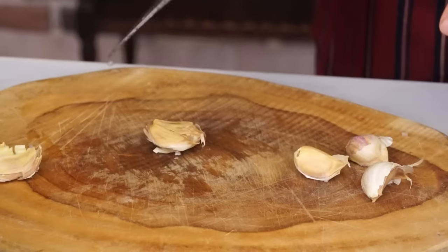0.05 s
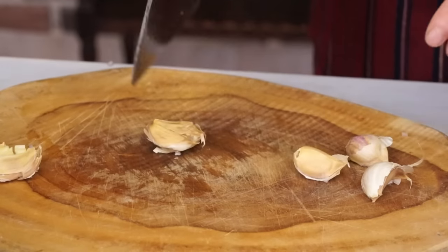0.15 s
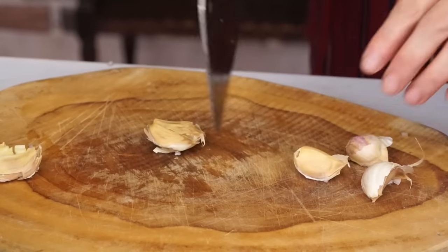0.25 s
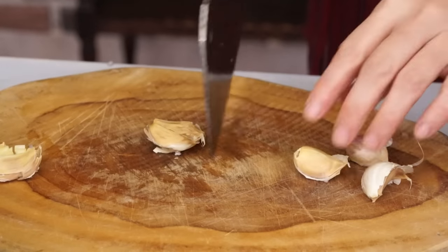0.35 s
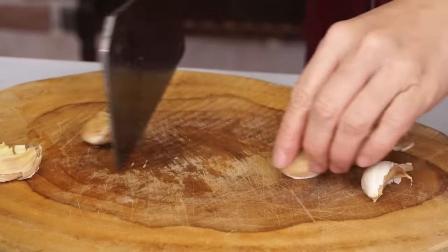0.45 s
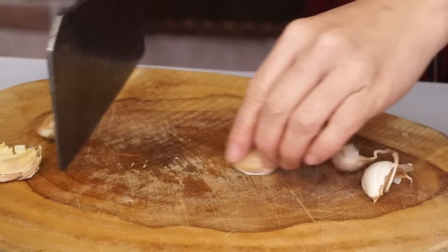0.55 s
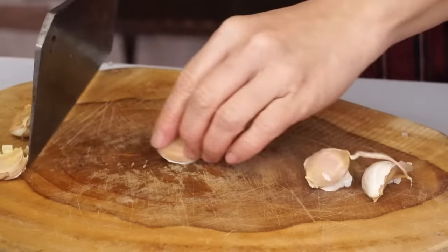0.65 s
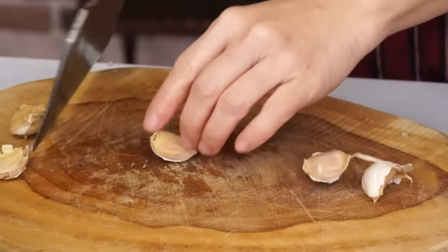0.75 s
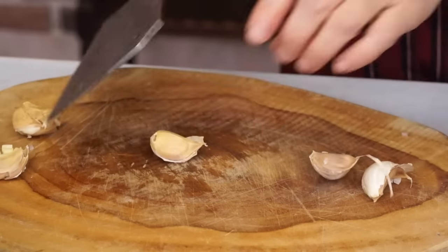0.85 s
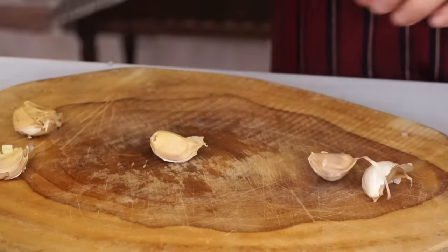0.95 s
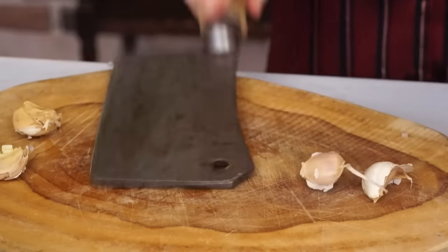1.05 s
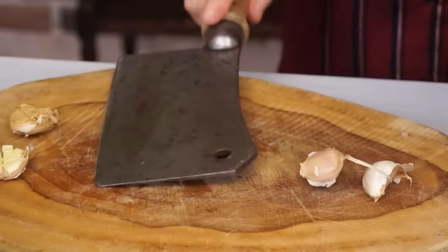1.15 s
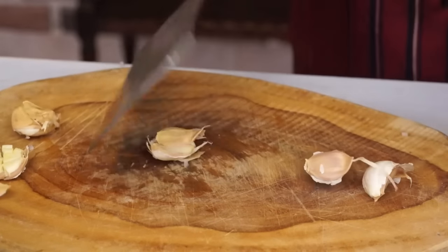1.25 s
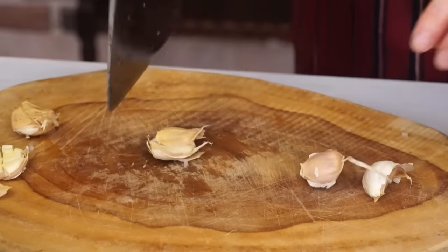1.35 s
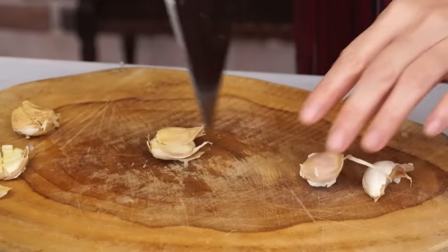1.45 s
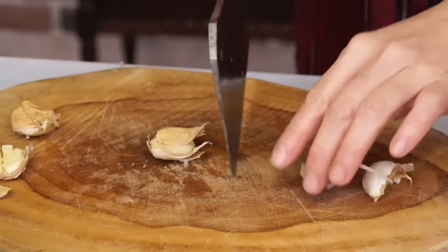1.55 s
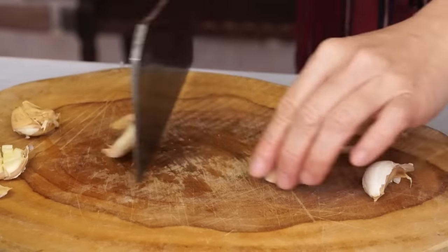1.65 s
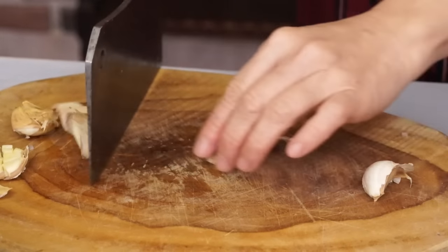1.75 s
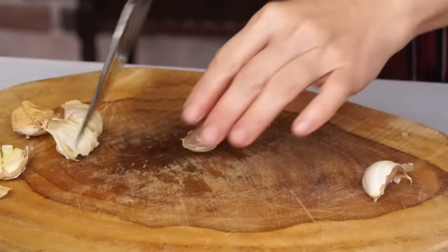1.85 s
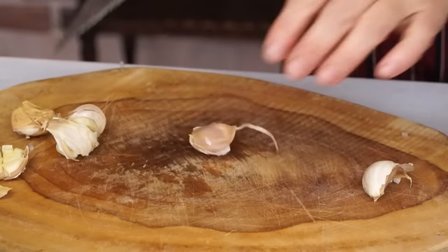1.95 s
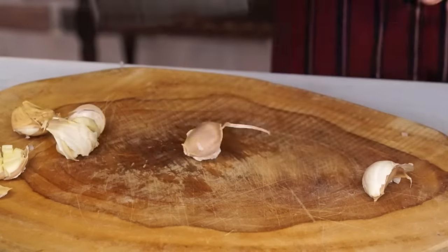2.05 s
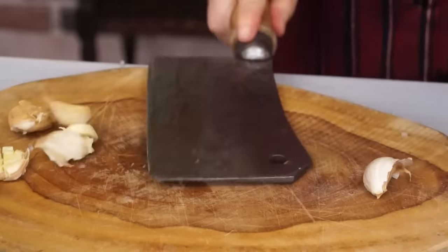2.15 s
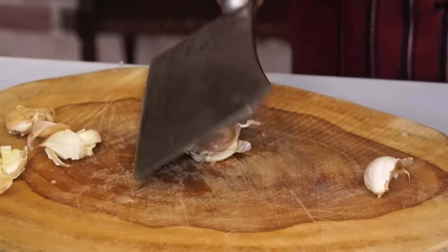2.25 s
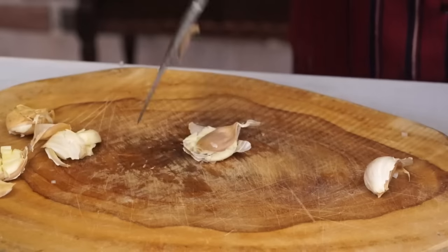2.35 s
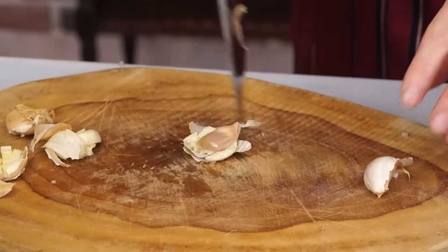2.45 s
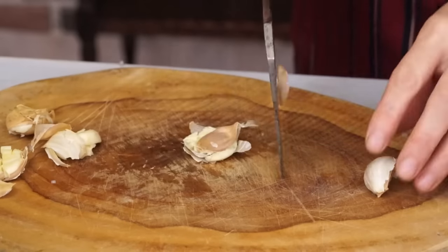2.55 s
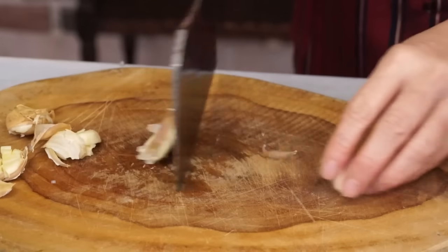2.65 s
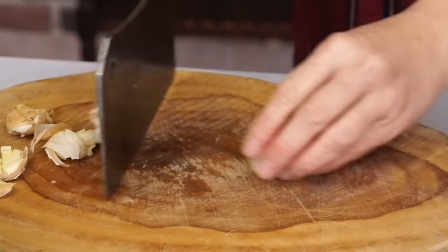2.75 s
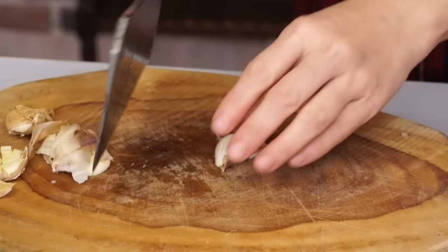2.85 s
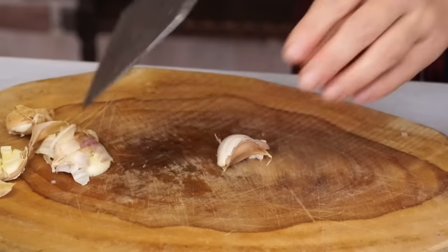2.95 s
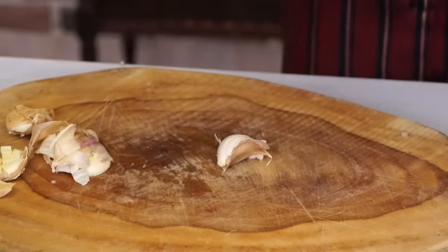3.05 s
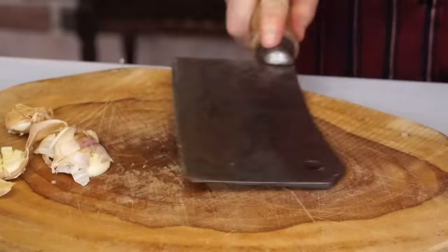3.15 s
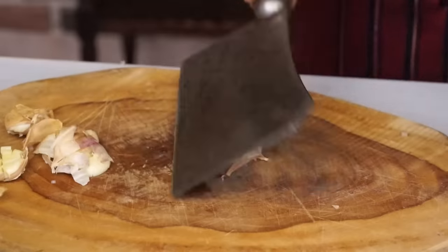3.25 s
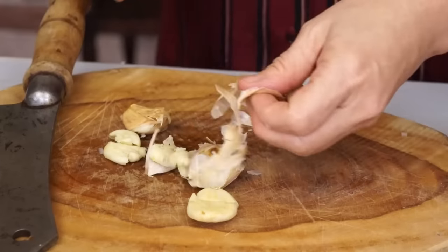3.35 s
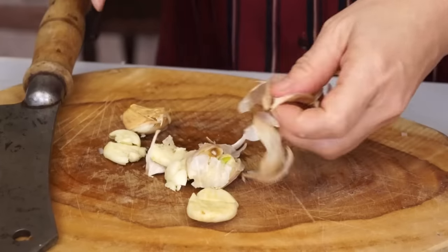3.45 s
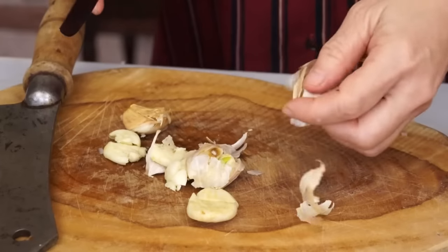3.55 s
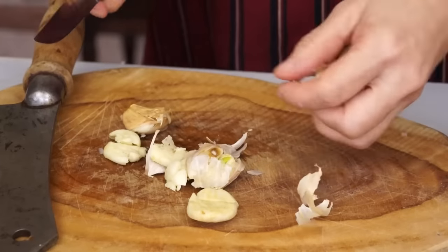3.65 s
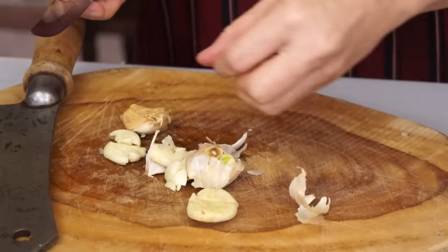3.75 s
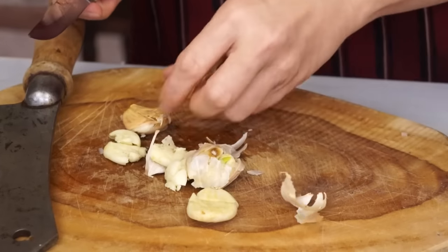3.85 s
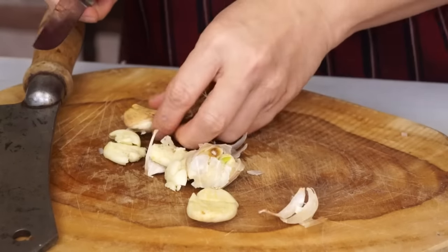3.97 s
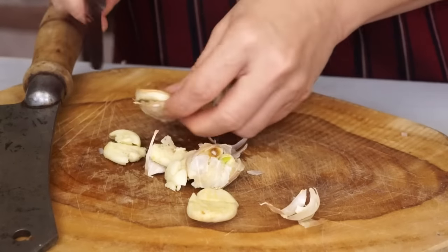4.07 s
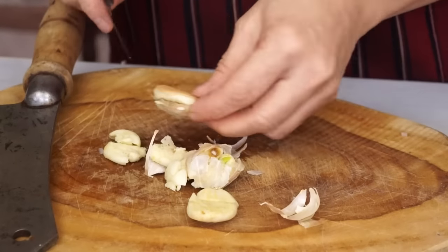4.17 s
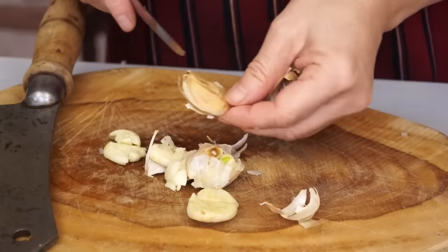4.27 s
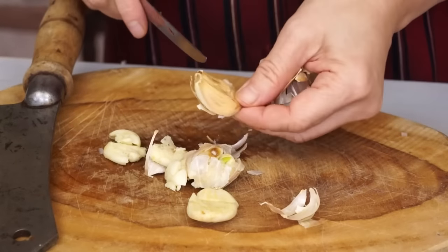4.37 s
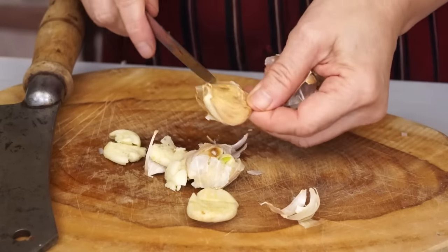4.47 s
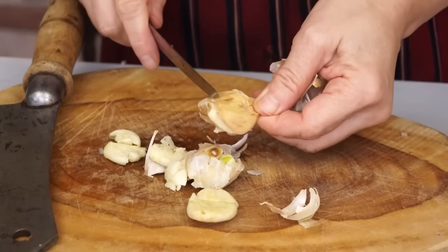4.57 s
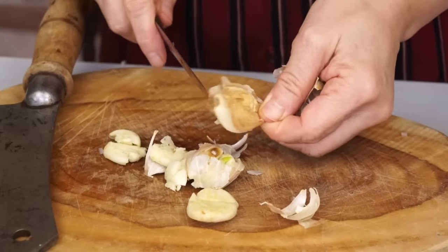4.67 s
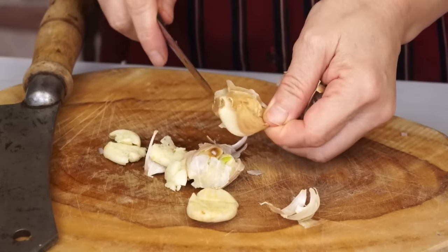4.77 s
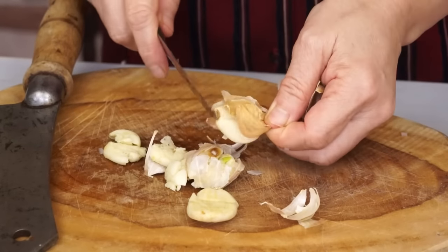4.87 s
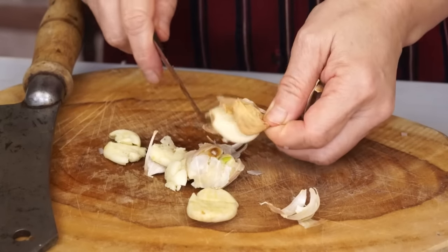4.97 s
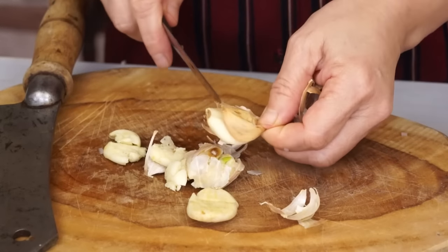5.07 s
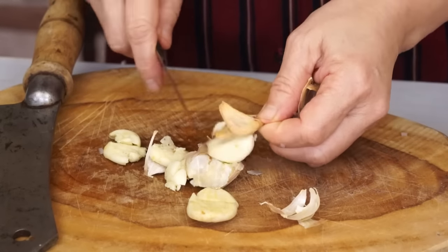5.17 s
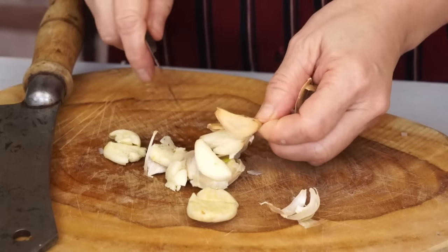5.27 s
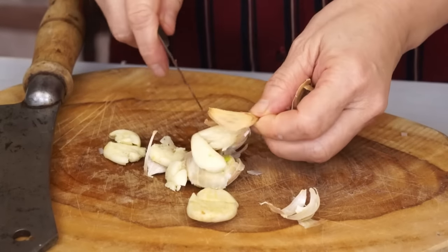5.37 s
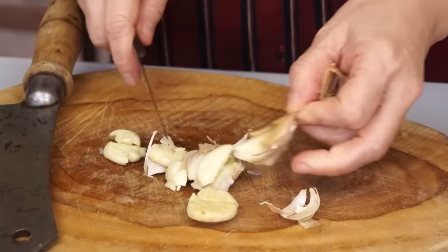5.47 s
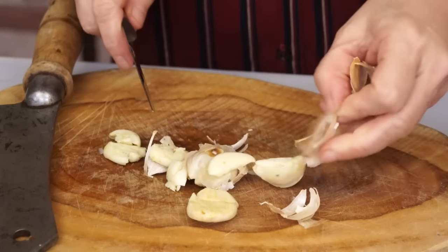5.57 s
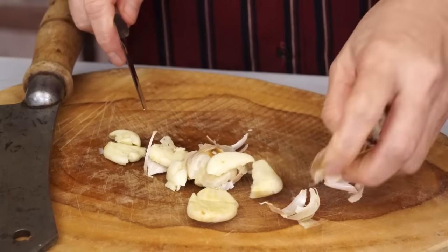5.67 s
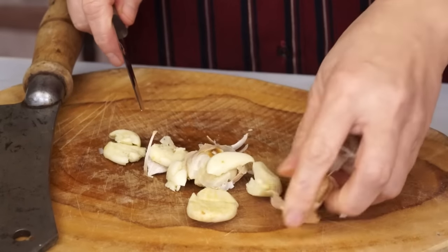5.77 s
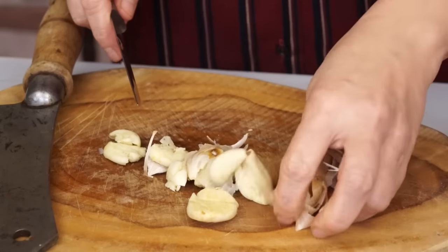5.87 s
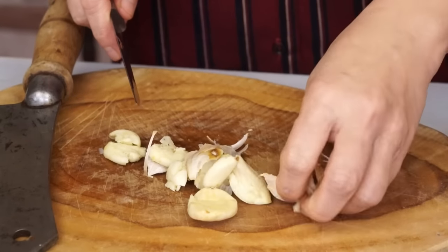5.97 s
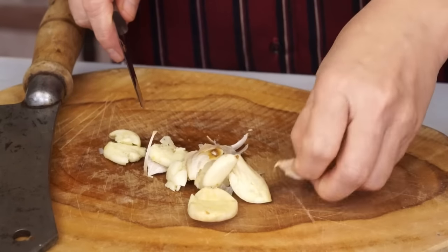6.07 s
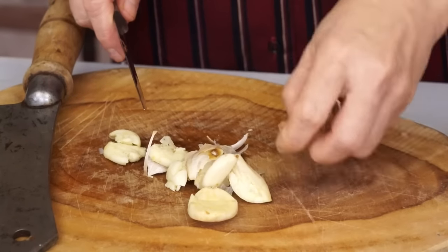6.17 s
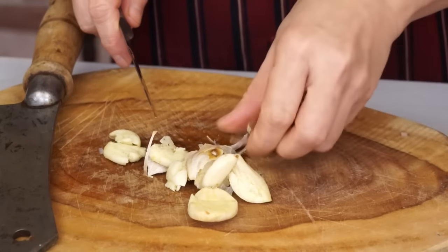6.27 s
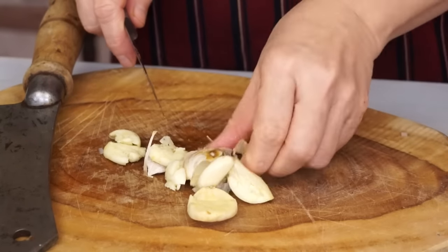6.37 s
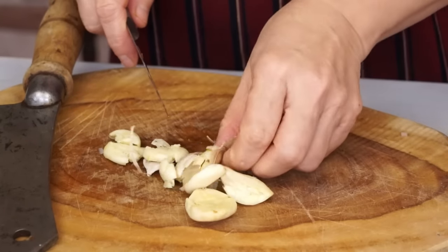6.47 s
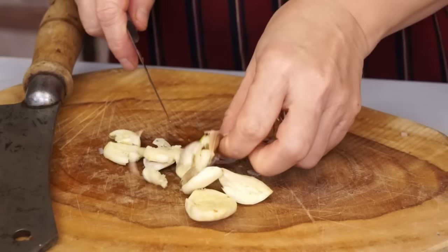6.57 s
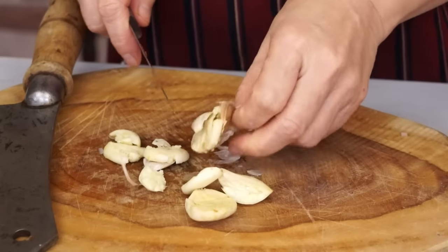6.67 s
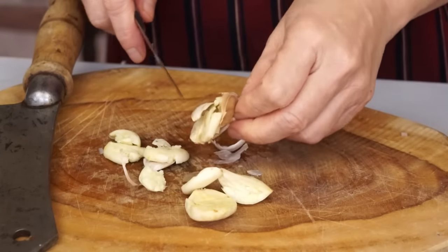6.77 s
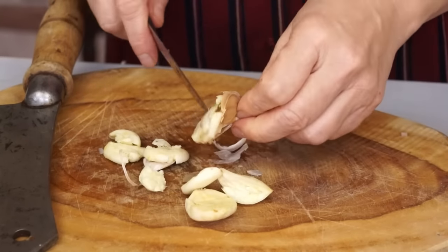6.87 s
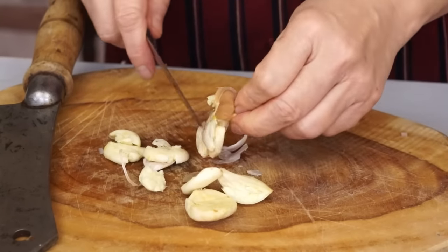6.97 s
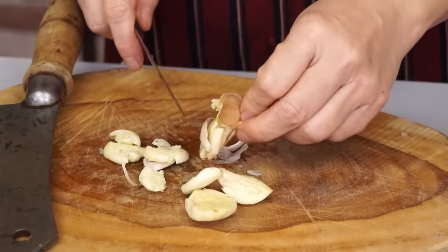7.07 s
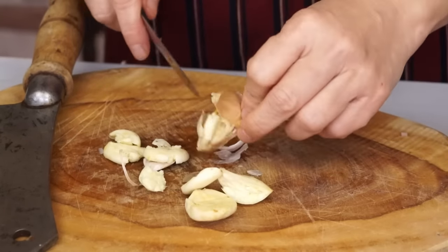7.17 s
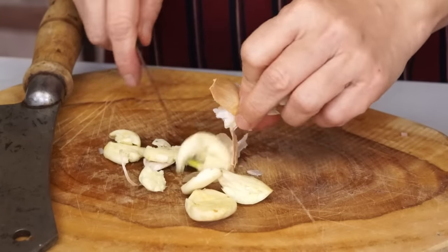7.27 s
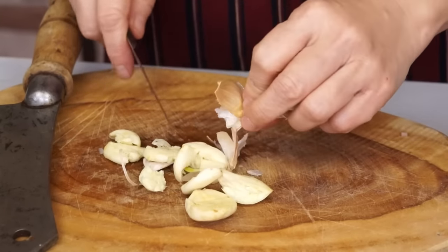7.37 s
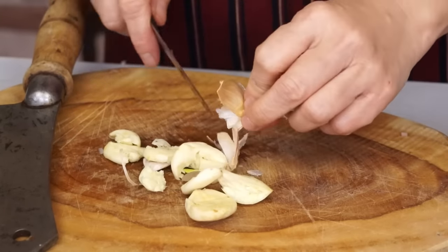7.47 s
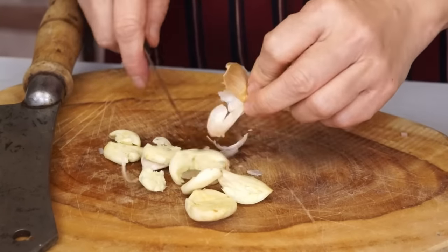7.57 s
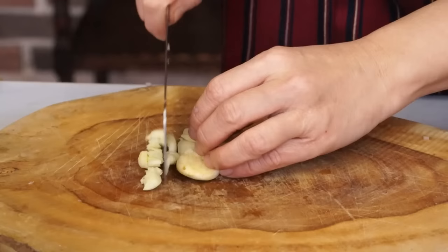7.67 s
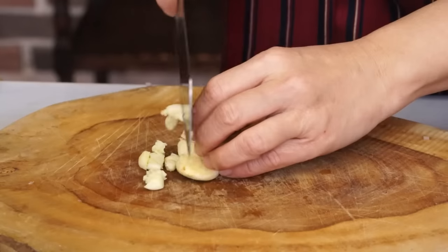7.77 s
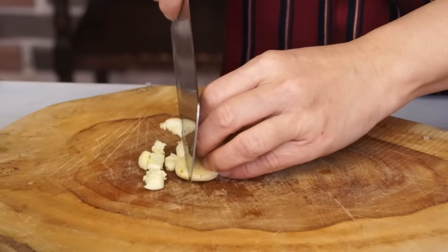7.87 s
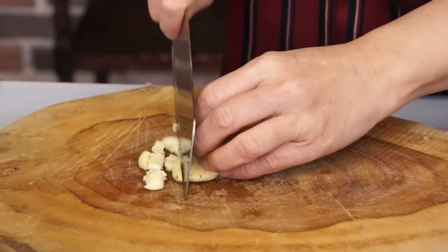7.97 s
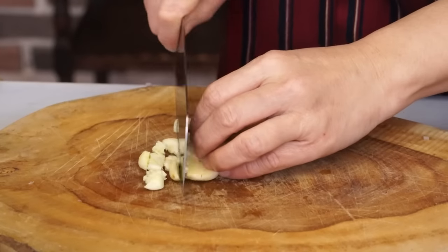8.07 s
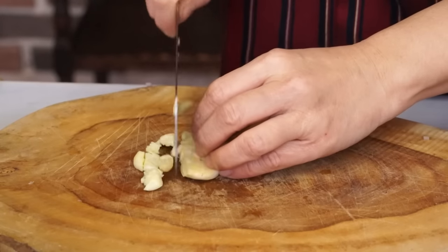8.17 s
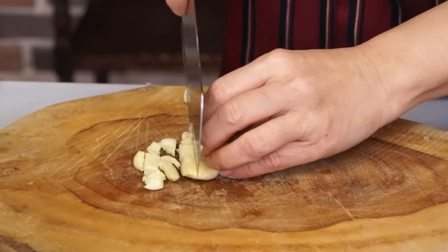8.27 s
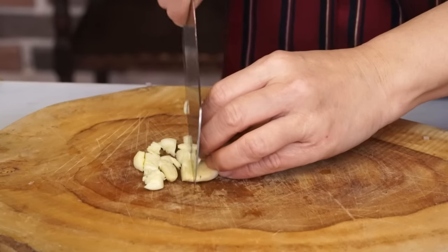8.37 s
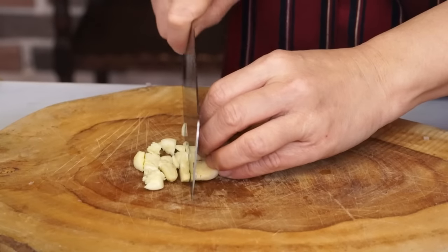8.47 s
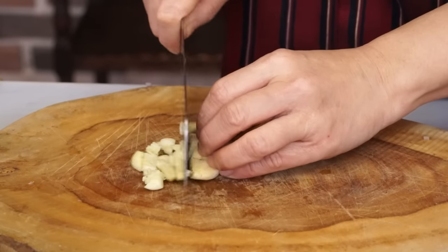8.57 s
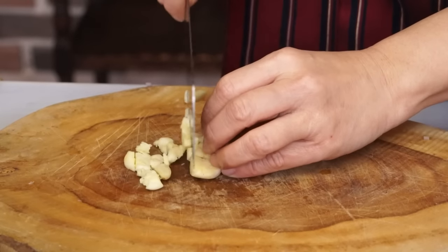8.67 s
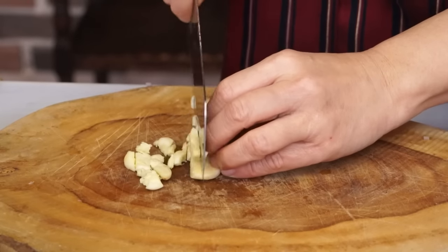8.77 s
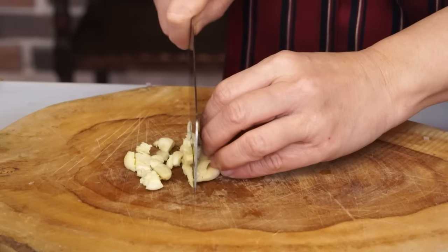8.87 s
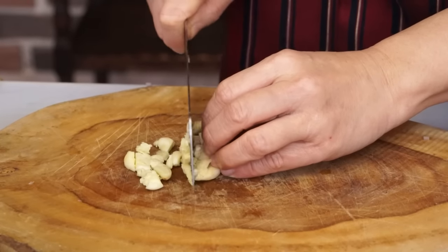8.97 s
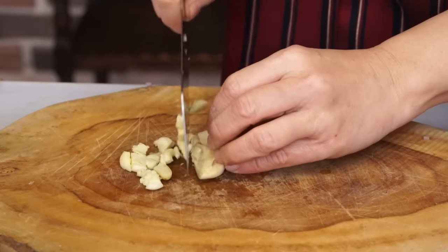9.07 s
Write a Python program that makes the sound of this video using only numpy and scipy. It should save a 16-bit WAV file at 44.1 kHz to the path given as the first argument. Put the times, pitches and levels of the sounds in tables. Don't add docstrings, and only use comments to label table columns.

```python
import sys
import numpy as np
from scipy import signal
from scipy.fft import rfft, irfft, next_fast_len
from scipy.io import wavfile
from scipy.ndimage import uniform_filter1d, map_coordinates

SR = 44100
rng = np.random.default_rng(int(sys.argv[2]) if len(sys.argv) > 2 else 0)


def to_wav(sig):
    pcm = np.clip(np.atleast_2d(sig), -1, 1) * 32767
    pcm = np.round(pcm).astype(np.int16)
    wavfile.write(sys.argv[1], SR, pcm.T)


def linear_from_db(decibels):
    return 10 ** (np.asarray(decibels, float) / 20)


N = 402633


def unit(x):
    return x / np.sqrt(np.mean(x ** 2) + 1e-20)


def along(points, hz):
    f, v = np.transpose(points)
    return np.interp(np.log(hz + 1), np.log(f + 1), v)


def coloured(x, tone):
    m = next_fast_len(x.shape[-1] + 4096)
    gain = linear_from_db(along(tone, np.fft.rfftfreq(m, 1 / SR)))
    return irfft(rfft(x, m) * gain, m)[..., :x.shape[-1]]


def coloured_noise(size, tone):
    return coloured(rng.standard_normal(size), tone)


def pair(size, alike):
    hz = np.fft.rfftfreq(size, 1 / SR)
    turn = np.arccos(np.clip(along(alike, hz), -1, 1)) / 2
    mid, side = irfft(rfft(rng.standard_normal((2, size))) * [np.cos(turn), np.sin(turn)], size)
    return np.array([mid + side, mid - side])


def grains(rate, spread_db):
    present = rng.random(N) < rate / SR
    return unit(present * linear_from_db(spread_db * rng.exponential(size=N)) * rng.standard_normal(N))


def strokes(rows, fall_s):
    t = np.arange(0, N / SR + .01, .001)
    s, db, rise, hold = np.abs(np.array(rows)[:, :4]).T[..., None] * [[[1]], [[-1]], [[1]], [[1]]]
    before = np.maximum((s - t) / rise, 0)
    after = np.maximum((t - s - hold) / fall_s, 0)
    top = np.max(db - 20 * before - 20 * after, axis=0)
    return linear_from_db(np.interp(np.arange(N) / SR, t, top))


# f/Hz, t60/s
KITCHEN = [(100, 0.56), (300, 0.41), (700, .45), (1800, 0.4), (5000, 0.33), (13000, 0.25)]
# f/Hz, likeness 0..1
ECHO_ALIKE = [(60, 0.98), (180, 1), (550, 0.86), (1650, 0.4), (4970, 0.17), (15000, 0.2)]


def tail(size):
    hz, t, z = signal.stft(pair(size, ECHO_ALIKE), SR, nperseg=256)
    patches = uniform_filter1d(rng.standard_normal(z.shape[1:]), 2, 0)
    patches = unit(uniform_filter1d(patches, 6, 1))
    fade_db = 1.5 * patches - 60 * t / along(KITCHEN, hz)[:, None]
    return signal.istft(z * linear_from_db(fade_db), SR, nperseg=256)[1][:, :size]


def panned(x, pan_db):
    return x * linear_from_db([[pan_db / 2], [-pan_db / 2]])


def roomy(x, pan_db, room_db):
    answer = tail(SR // 2)
    wet = signal.fftconvolve(x[None], answer / np.linalg.norm(answer[0]), axes=1)[:, :N]
    near = x + linear_from_db(-8.5) * np.roll(x, round(.0052 * SR))
    return panned(near + linear_from_db(room_db) * wet, pan_db)


SINGING_HZ = (1641, 1868, 4517, 6372)
# f/Hz, level/dB, t60/s
BLADE = [(2505, -6, .2), (2972, -10, .22), (3560, -8, .2), (5152, -12, .2), (6750, -9, .15), (8600, -8, .2),
         (11010, -13, .2)]


def steely(x, lift_db, width_hz):
    f = np.fft.rfftfreq(x.shape[-1], 1 / SR)
    modes = [*SINGING_HZ, *np.array(BLADE)[:, 0]]
    peaks = sum(1 / (1 + ((f - hz) / width_hz) ** 2) for hz in modes)
    return irfft(rfft(x) * linear_from_db(lift_db * np.minimum(peaks, 1)), x.shape[-1])


def ring(modes, t, attack):
    def waver():
        return np.interp(t * 60, np.arange(62), rng.standard_normal(62))

    total = 0
    for hz, db, t60 in modes:
        level_db = db + rng.normal(0, 2.67) + 2.44 * waver() - 60 * t / t60
        phase = 2 * np.pi * (hz * t + .15 * rng.random()) + 0.45 * waver()
        total = total + linear_from_db(level_db) * np.sin(phase)
    return total * (1 - np.exp(-t / attack))


def strikes(rows, tone, wood, crack_s, click_db, pan_db, steel_db, squeezed=False):
    slap_s = 0.0039
    crush_s, crush_share = 0.024, 0.87
    recover_s = 0.074
    size = 2 ** 15
    t = np.arange(size) / SR
    out = np.zeros((2, N + 2 * SR))
    middle_band = signal.butter(1, (200, 1000), "band", fs=SR, output="sos")
    for s, db, thump_db, blade_db, room_db in rows:
        click = np.roll(linear_from_db(click_db - 60 * t / .006), round(squeezed * slap_s * SR))
        fall = linear_from_db(-60 * t / crack_s) + click
        crack = unit(coloured_noise(size, tone)) * fall * (1 - np.exp(-t * 1500))
        room = steely(coloured(tail(size), tone), steel_db, 30)
        room = room / np.std(room[:, :1500]) * (1 - np.exp(-t * 200)) * (t < .65)
        thump = linear_from_db(thump_db) * ring(wood, t, 0.0014)
        steel = linear_from_db(blade_db) * ring(BLADE, t, 0.0013)
        blow = panned(crack + thump + steel + linear_from_db(room_db) * room, pan_db)
        middle = signal.sosfilt(middle_band, blow)
        blow = blow - squeezed * crush_share * np.exp(-(t / crush_s) ** 2) * middle
        squeeze_db = squeezed * (10.5 + 0.8 * room_db)
        gain = linear_from_db(db - 9 + squeeze_db * (1 - np.exp(-(t / recover_s) ** 2)))
        out[:, SR // 2 + round(s * SR):][:, :size] += gain * blow
    rumble_cut = signal.butter(2, 45, "high", fs=SR, output="sos")
    return signal.sosfilt(rumble_cut, out)[:, SR // 2:][:, :N]


EDITS = (3.349, 7.689)
TAKE_DB = (-73.5, -70.5, -69)
# f/Hz, level/dB
ROOM_TONE = [(12, -47), (20, 4), (124, -3), (289, -6), (332, -6), (404, -5), (583, -8.5), (913, -11),
             (2810, -16.5), (4410, -20.5), (6530, -20.5), (12100, -22.5), (15200, -24.5), (16500, -39.5)]
# f/Hz, likeness 0..1
ALIKE = [(60, 1), (180, 0.88), (550, 0.073), (1650, 0.072), (4970, 0.16), (15000, 0.17)]


def room_tone():
    duck_db, duck_s = 10, .9
    t = np.arange(N) / SR
    drift, lumps = map_coordinates(rng.standard_normal(120), [t * np.array([[5], [12]])])
    hum = unit(coloured_noise(N, [(90, -41), (115, -8.0), (140, 5.0), (175, -10.5), (230, -36.5)]))
    since = t - np.array(SMASH)[:, :1]
    duck = np.max((since > 0) * np.exp(-(since / duck_s) ** 2), axis=0)
    take_db = np.array(TAKE_DB)[np.searchsorted(EDITS, t)]
    gain = linear_from_db(take_db - duck_db * duck * (t < EDITS[0]))
    hiss = unit(coloured(pair(N, ALIKE), ROOM_TONE))
    return gain * (linear_from_db(5.0 + 1.1 * drift) * hiss + linear_from_db(-3.0 + 2.2 * lumps) * hum)


# peak t/s, level/dB, rise/s per 20 dB, hold/s
RUB = [(6.024, -55.5, 0.12, 0.0042), (6.48, -69.5, 0.29, 0.012)]


def hand_wipe():
    tone = [(90, -27), (137, 8.5), (220, -27), (375, 8.0), (600, -12), (2000, -40)]
    return roomy(strokes(RUB, 0.084) * unit(coloured_noise(N, tone)), 0, -10.0)


# first snap t/s, peak level/dB, length/s over which more snaps follow
SNAPS = [(3.607, -38.5, .01), (3.683, -39, .05), (3.818, -46.5, .015), (3.881, -45, .045),
         (4.067, -47.5, .02), (4.4396, -48, .03), (4.7078, -26.5, .01), (4.8376, -44.5, .03),
         (4.9592, -30, .018), (5.0057, -41, .015), (5.0336, -27.5, .008), (5.1440, -39, .02),
         (5.1633, -29, .04), (5.327, -41, .008), (5.441, -36, .03), (5.6196, -34.5, .01),
         (5.874, -36, .012), (5.926, -36, .05), (5.991, -33, .025), (6.048, -36, 0.039),
         (6.1227, -34, 0.0065), (6.5637, -34.5, .01), (6.6767, -34, .01), (6.935, -36.5, .055),
         (7.0217, -35, .012), (7.0748, -46, .008), (7.252, -43.5, .07), (7.2855, -33, .01),
         (7.36, -35.5, .01), (7.568, -35.5, .012)]


def tears():
    s, db, length = np.array(SNAPS).T[..., None]
    chance = rng.random((len(s), 2, 8))
    later = .0065 * np.cumsum(.4 + 1.2 * chance[:, 0], axis=1)
    later_db = db + 2 + 5.5 * np.log(chance[:, 1] + 0.032)
    size = linear_from_db(later_db) * np.clip((length - later) / 0.0024, 0, 1)
    at = np.round(np.hstack([s, s + later]) * SR).astype(int)
    return np.bincount(at.ravel(), np.hstack([linear_from_db(db), size]).ravel(), N)


# peak t/s, rustle level/dB, rise/s per 20 dB, hold/s, larger flakes level/dB
PEEL = [(3.579, -52, -0.17, 0.022, -7.5), (3.688, -56.5, 1, 0.036, -4.5), (3.84, -62, 2.5, .08, -6),
        (4.041, -61, 3.5, 0.06, -1.5), (4.285, -66, 0.1, 0.0092, -4.5), (4.436, -60.5, .04, 0.029, -8.5),
        (4.697, -55, 0.3, .02, -6), (4.967, -57.5, .07, 0.064, -18), (5.193, -62, -0.4, 0.025, -10.5),
        (5.435, -51.5, 0, 0.0078, -5), (5.601, -54.5, 0.5, 0.037, -6.5), (5.76, -58.5, 1.3, 0.054, -3.5),
        (5.947, -50, 0.35, 0.16, -4.5), (6.245, -49.5, 0.16, .07, -4.5), (6.507, -55.5, 1, 0.068, 2),
        (6.68, -58, -2, .01, -15.5), (6.743, -61, 0.5, 0.017, 3), (6.942, -52.5, 0.1, .04, -9),
        (7.168, -52, .015, .025, -5), (7.27, -67.5, 2, 0.044, -6), (7.575, -57.5, -0.46, 0.023, -5),
        (7.651, -52, -0.38, .02, -5)]
# f/Hz, level/dB
SKIN_TONE = [(2650, -46), (4500, -15), (5580, -20.5), (6420, -8), (6850, -1.5), (8010, 2.5), (15000, 0.5),
             (16300, -25.5)]


def skins():
    flake_tone = [(700, -14.0), (1400, -10.5), (3000, -4.5), (4300, -2.5), (5600, -1.5), (6600, -3),
                  (8000, -48)]
    clumps = linear_from_db(4.5 * map_coordinates(rng.standard_normal(N // 300 + 4), [np.arange(N) / 300]))
    crackle = clumps * (grains(3000, 1.7) + .55 * rng.standard_normal(N))
    flakes = linear_from_db(np.interp(np.arange(N) / SR, *np.array(PEEL)[:, ::4].T))
    thin = unit(coloured(crackle, SKIN_TONE))
    large = unit(coloured(crackle, flake_tone))
    rustle = strokes(PEEL, 0.087) * (thin + flakes * large)

    at, t = tears(), np.arange(1200) / SR
    bright_fall = signal.oaconvolve(at, linear_from_db(-60 * t / .003))[:N]
    body_fall = signal.oaconvolve(at * flakes, linear_from_db(-5.5 - 60 * t / 0.015))[:N]
    bright = unit(coloured_noise(N, SKIN_TONE)) * bright_fall
    body = unit(coloured_noise(N, flake_tone)) * body_fall
    return roomy(linear_from_db(-7.5) * rustle, -0.55, -1.3) + roomy(linear_from_db(-2.5) * (bright + body), -1.9, 0.36)


# peak t/s, level/dB, rise/s per 20 dB, hold/s
CUT = [(8.012, -45, 0.062, 0.0017), (8.466, -42, 0.046, 0.0042), (8.878, -44.5, 0.015, .04)]
# f/Hz, level/dB
CRUNCH_TONE = [(59, -30), (100, -17), (202, 5.5), (322, -6), (676, -15), (1130, -13.5), (1830, -18),
               (4110, -14), (13500, -18), (16000, -34)]


def crunch():
    flesh = grains(7000, 3.5) + 0.54 * rng.standard_normal(N)
    return roomy(linear_from_db(3.0) * strokes(CUT, 0.025) * unit(coloured(flesh, CRUNCH_TONE)), -0.038, -2.0)


# t/s, peak level/dB, thump level/dB, blade ring level/dB, room level/dB
EARLIER_CHOP = [(7.56, -11.5, -3, -55, -8.5)]
CHOP = [
    (8.0134, -5, -3.5, -58, -10),
    (8.470, -9.5, -2.5, -60, -9.5),
    (8.911, -32.5, 1, -56, -7.5),
]
SOFT_LANDING = [(7.985, -45.5, 4.5, -57.5, 4), (8.405, -44.5, 4.8, -58.5, -16.5), (8.44, -41, 4, -59, -1),
                (8.875, -29.5, 1.8, -60, -5.5)]
# f/Hz, level/dB
CHOP_TONE = [(35, -61), (60, -29), (102, -46), (131, -9), (296, -14), (349, -6), (504, -8.5), (594, -3),
             (913, -5), (1190, 0), (1490, -16), (2390, -15.5), (3120, -34), (8000, -48), (10400, -89.5)]
# f/Hz, level/dB, t60/s
KNIFE_WOOD = [(152.7, -9, 0.13), (379, -2, 0.082), (609, -6, 0.14), (812, -2, 0.11), (1098, 3, 0.05),
              (1305, -1.5, 0.062), (2440, -0.5, 0.021)]
# f/Hz, level/dB, t60/s
BOARD = [(134.3, -3, 0.26), (142.3, -2.5, .3), (165, -3.5, 0.12), (269, -12, 0.41), (376, -1.5, 0.25),
         (466, -11, 0.045), (610, -9.5, 0.05), (784, -13.5, .05), (1100, -13, 0.051)]


def knife():
    chops = strikes(EARLIER_CHOP + CHOP, CHOP_TONE, KNIFE_WOOD, 0.042, 1.6, -0.31, 0)
    landings = strikes(SOFT_LANDING, CHOP_TONE, BOARD[1:3], 0.062, -6, -.3, 0)
    return chops + landings + crunch()


# t/s, peak level/dB, blade ring level/dB, room level/dB
TICK = [(0.417, -49.5, -12, -10), (0.4347, -41.5, -32, -1), (0.4469, -24.5, -13, -20.5),
        (0.4959, -22, -9, -16), (0.628, -46, -15.5, -22.5), (0.846, -48.5, -24, -11.5),
        (1.027, -42.5, -7.5, -14), (1.696, -51.5, 9, 3), (2.6677, -42.5, -1, -3.5)]
# f/Hz, level/dB
TICK_TONE = [(880, -40.5), (1500, -18.5), (2740, -14), (5540, -11), (6890, -4), (7840, -15.5),
             (12400, -11.5), (16000, -36.5)]


def edge_ticks():
    rows = [(s, db, -40, ring_db, room_db) for s, db, ring_db, room_db in TICK]
    return strikes(rows, TICK_TONE, BOARD, 0.032, .1, -1.5, 9.3)


# peak t/s, level/dB, rise/s per 20 dB, hold/s
SWEEP = [(.447, -50, 0.04, 0.073), (.6, -60, -0.24, 0.082), (1.597, -62, -1.8, .08),
         (1.74, -65.5, 1.5, .05), (2.78, -50, 0.24, 0.0039)]
# f/Hz, level/dB
SCRAPE_TONE = [(590, -36.5), (1000, -2.5), (1430, -10.5), (1690, -8), (2470, -6), (2680, -13), (6180, -7),
               (16000, -14)]


def sweeps():
    hum_tone = [(90, -29.5), (145, 9.5), (220, -9), (385, -5), (600, -11), (1200, -30)]
    t = np.arange(N) / SR
    lifted = sum((t > smash[0]) & (t < knock[0]) for smash, knock in zip(SMASH, KNOCK[2:]))
    friction = grains(6000, 1.9) + 0.18 * rng.standard_normal(N)
    friction = (1 - lifted) * strokes(SWEEP, 0.092) * friction
    scrape = coloured(friction, SCRAPE_TONE) / np.std(coloured_noise(SR, SCRAPE_TONE))
    hum = coloured(friction, hum_tone) / np.std(coloured_noise(SR, hum_tone))
    return roomy(steely(linear_from_db(-2) * scrape, 7.7, 40) + linear_from_db(-5.5) * hum, -1.1, -2.3)


# peak t/s, level/dB, rise/s per 20 dB, hold/s
SINGING = [
    [(.45, -61, .006, .01), (.52, -56.5, 0.059, .05), (1.47, -76, .15, .01), (1.7, -65, .15, 0.041),
     (2.5, -71.5, 0.18, .05), (2.76, -59, 0.099, 0.036), (3.02, -75, 0.1, 0.039)],
    [(.02, -57, .02, .01), (.635, -60, 0.013, 0.0079), (1.117, -40.5, 0.0061, 0.0044),
     (1.65, -64, .03, .03), (3.172, -49, 0.0045, .06)],
    [(.522, -50, 0.032, .03), (1.118, -35.5, 0.0022, 0.028), (1.725, -57.5, 0.062, 0.0062),
     (2.19, -50, 0.037, .01), (2.81, -66, .15, .04), (2.92, -74, .08, 0.053)],
    [(1.118, -33, 0.003, 0.0071), (1.72, -67, 0.071, .01), (2.148, -35, .004, 0.068),
     (2.39, -64, 0.09, .01), (2.79, -65, .2, .02)],
]
SINGING_FALL_S = (0.17, 0.12, 0.12, 0.076)


def blade_song():
    t = np.arange(N) / SR
    song = 0
    for hz, rows, fall_s in zip(SINGING_HZ, SINGING, SINGING_FALL_S):
        beat = map_coordinates(rng.standard_normal(200), [np.minimum(t, 4) * 30])
        start, apart = rng.random(2) * [1, .12]
        phase = 2 * np.pi * (hz * t + start + apart * np.array([[1], [-1]]))
        song = song + strokes(rows, fall_s) * linear_from_db(1.9 * beat) * np.sin(phase)
    return linear_from_db(4.5) * song


# t/s, peak level/dB, thump level/dB, blade ring level/dB,
# room level/dB
EARLIER_SMASH = [(-0.15, -10.5, -21, 2, -0.45)]
SMASH = [
    (1.111, -9, -8, -12.5, -8.5),
    (2.140, -13.5, -11, -2, -2),
    (3.165, -10.5, -17, -12.5, -8),
]
KNOCK = [(0.4466, -45.5, 20, -31, -6.5), (.4955, -37, 13.5, -19, -3), (1.587, -15.5, -8, -25.5, -10.5),
         (2.5804, -7.5, -17.5, -44.5, -10), (3.191, -16.5, -11, -19, -10)]
# f/Hz, level/dB
OPENING_TONE = [(35, -50), (60, -26), (146, -15.5), (207, -22), (398, -9), (503, -22), (1140, -6),
                (1380, -17), (1860, -17), (2770, -17.5), (3580, -17.5), (16000, -34)]
SMASH_TONE = [(24, -60), (40, -24), (140, -9), (226, -15.5), (372, -0.5), (412, -7.5), (1850, -14),
              (3830, -17), (5870, -19), (6330, -18.5), (6820, -18), (11300, -21), (16000, -32)]
KNOCK_TONE = [(35, -60), (60, -37.5), (130, -0.5), (166, -6), (212, -12), (413, -6.5), (658, -13),
              (803, -3), (1220, -9.5), (3470, -36), (6740, -41.5), (12000, -62.5), (15600, -99.5)]


def cleaver():
    earlier = strikes(EARLIER_SMASH, OPENING_TONE, BOARD, .03, 0, -0.54, 10.7)
    smashes = strikes(SMASH, SMASH_TONE, BOARD, 0.031, 2.6, -.5, 6.0, squeezed=True)
    knocks = strikes(KNOCK, KNOCK_TONE, BOARD, 0.052, 1.2, -0.67, 2.3)
    return earlier + smashes + knocks + edge_ticks() + sweeps() + blade_song()


def scene():
    t = np.arange(N) / SR
    first, last = t < EDITS[0], t >= EDITS[1]
    peeling = skins() + hand_wipe()
    return room_tone() + peeling * ~first * ~last + knife() * last + cleaver() * first


def roll_off(x):
    return signal.sosfilt(signal.butter(12, 16980, fs=SR, output="sos"), x)


# f/Hz, level/dB
PORTS = [(200, 0.5), (3000, 0.9), (9000, -1.5), (14000, -4.5)]


def record(dry):
    hz = np.fft.rfftfreq(N, 1 / SR)
    gain = linear_from_db(along(PORTS, hz) * np.array([[.5], [-.5]])) * (hz < 16500)
    mix = irfft(rfft(dry) * gain, N)
    return roll_off(mix)


dry = scene()
out = record(dry)
to_wav(out)
```